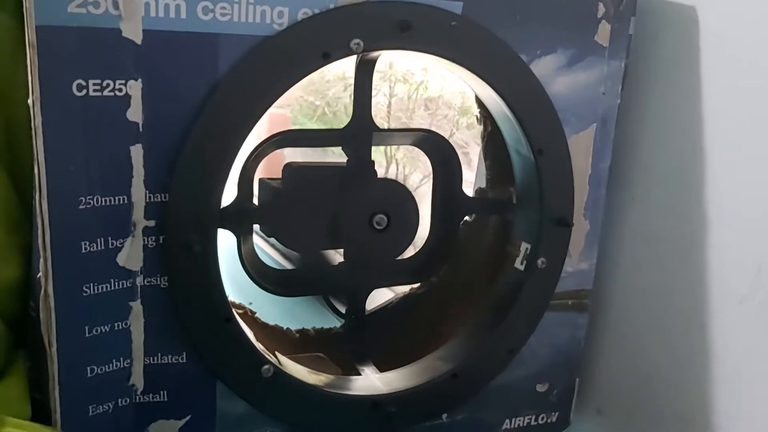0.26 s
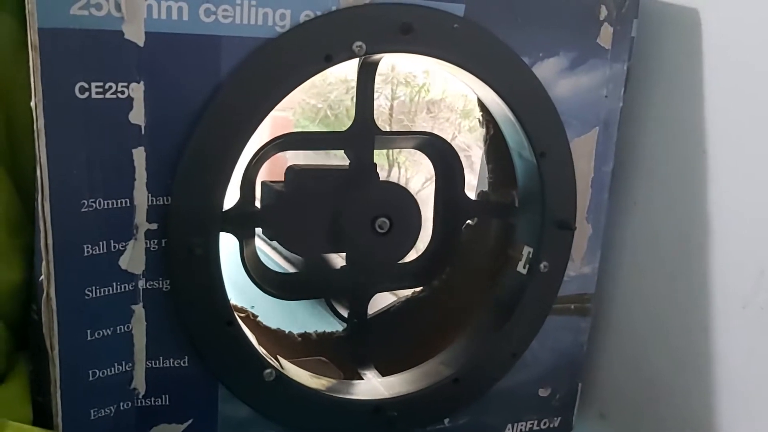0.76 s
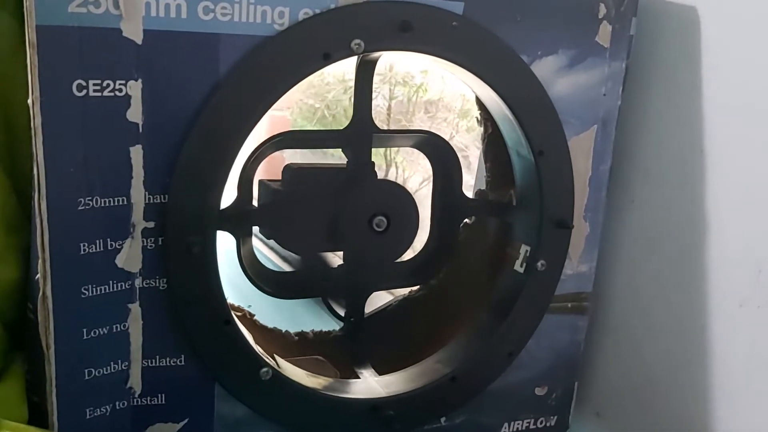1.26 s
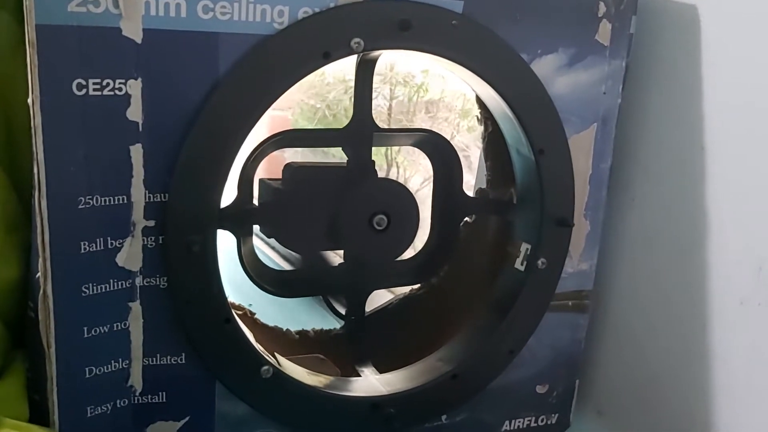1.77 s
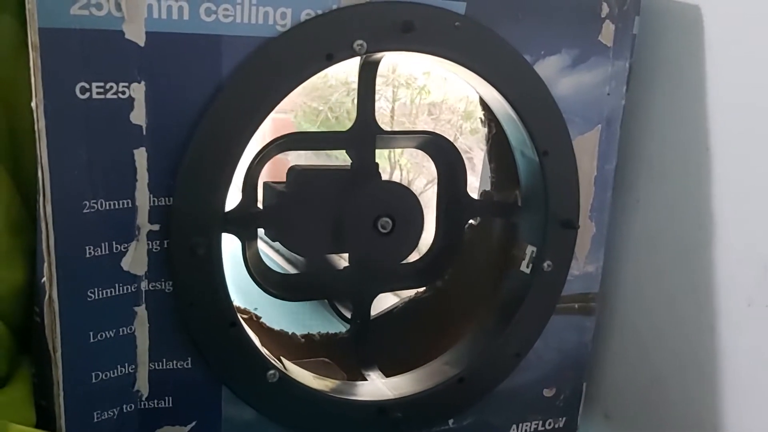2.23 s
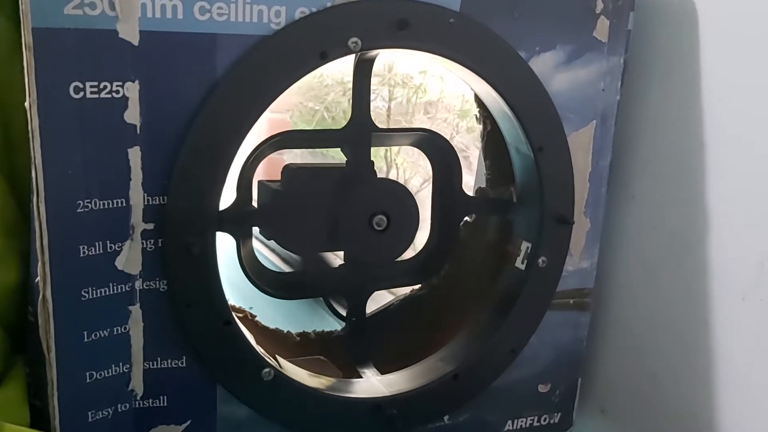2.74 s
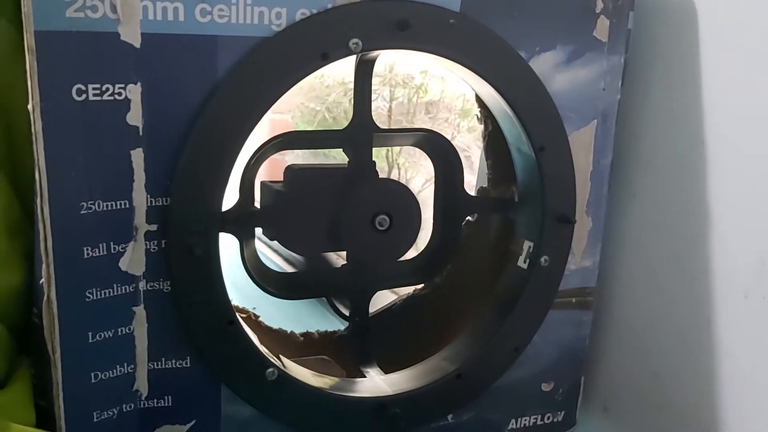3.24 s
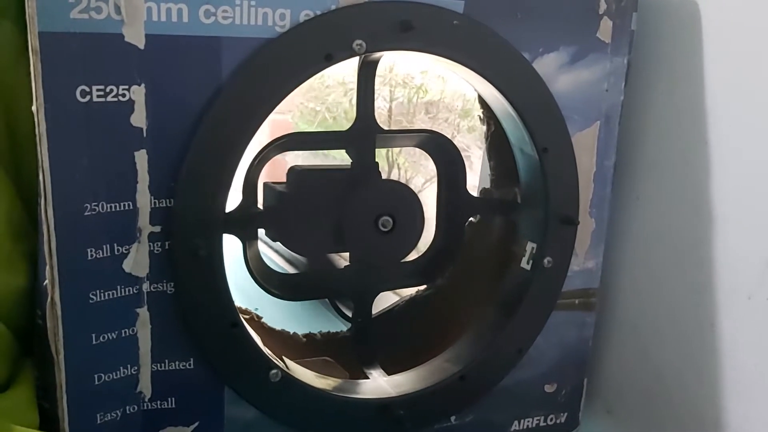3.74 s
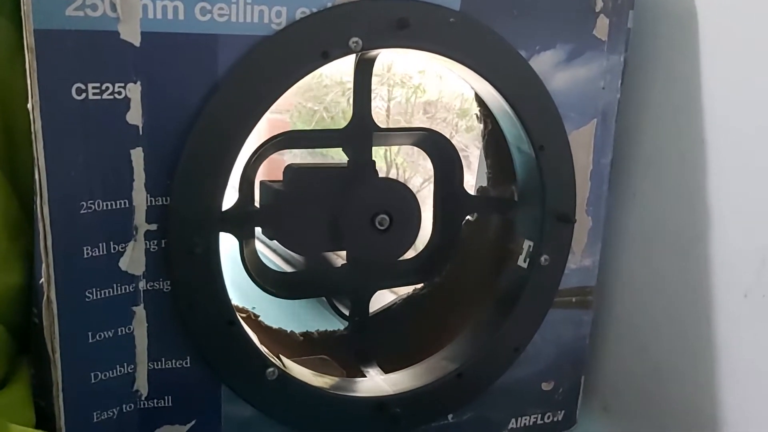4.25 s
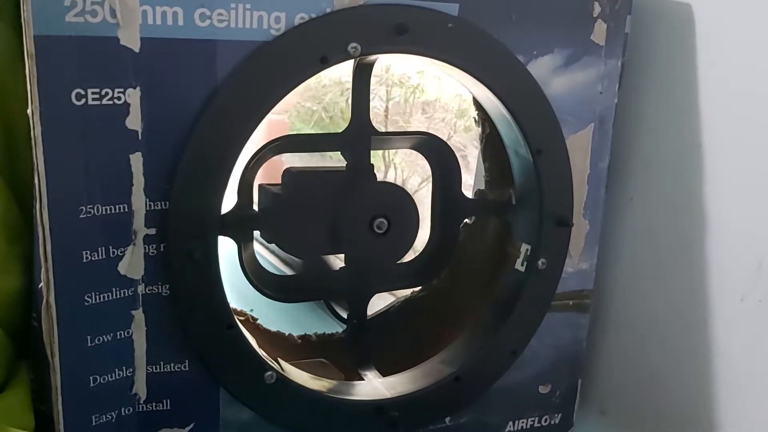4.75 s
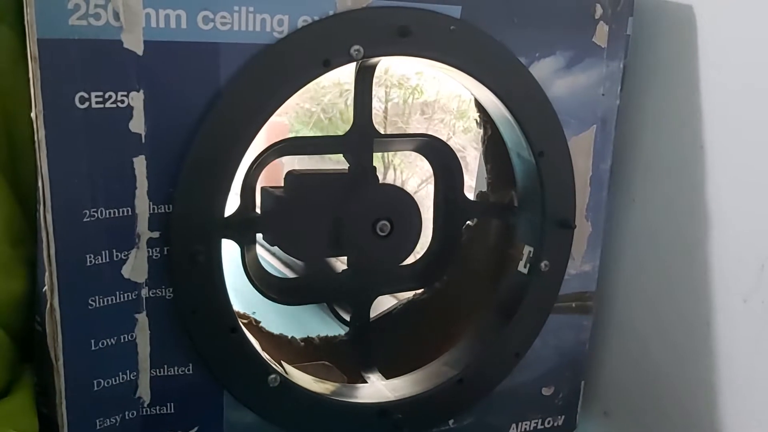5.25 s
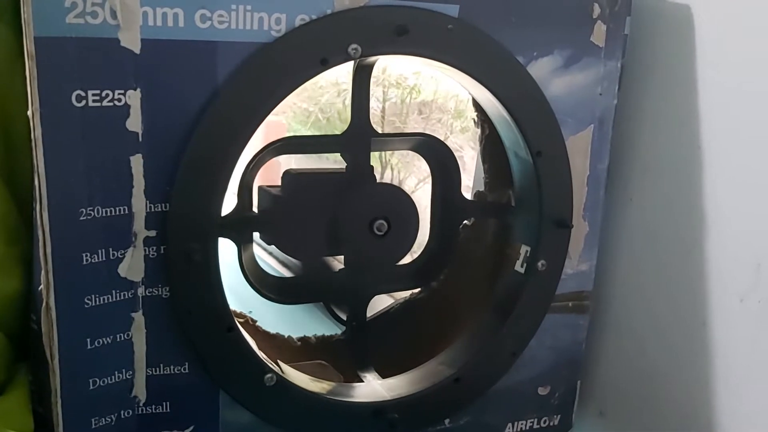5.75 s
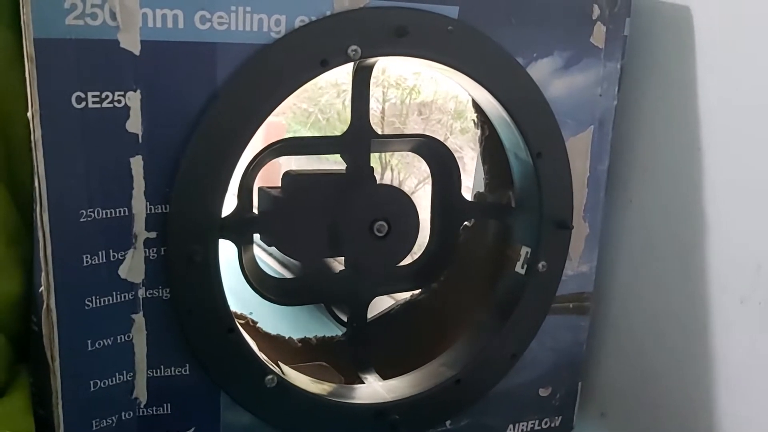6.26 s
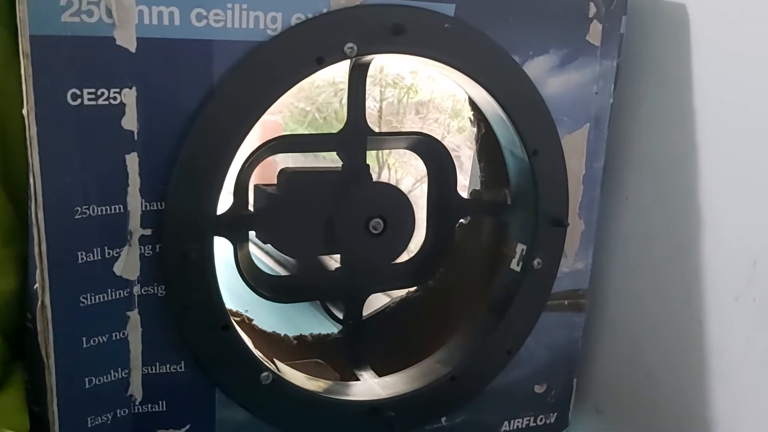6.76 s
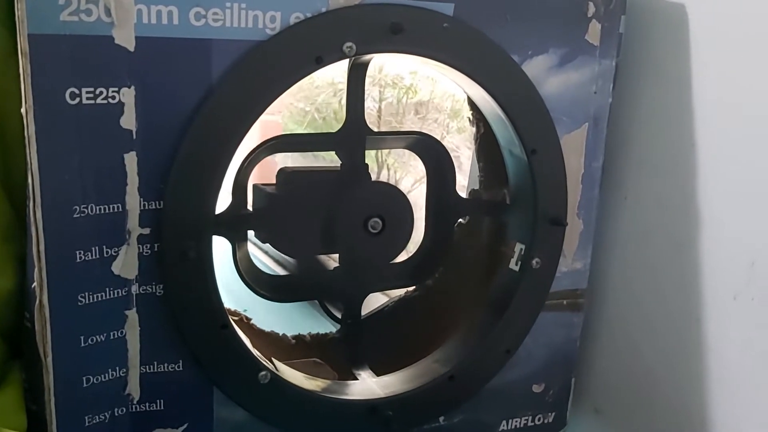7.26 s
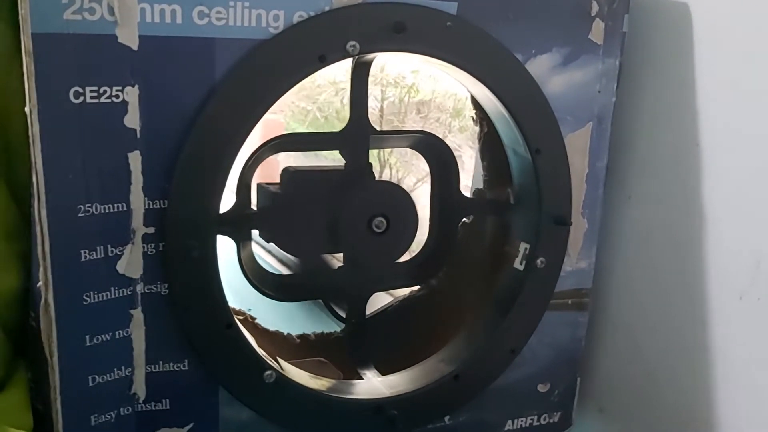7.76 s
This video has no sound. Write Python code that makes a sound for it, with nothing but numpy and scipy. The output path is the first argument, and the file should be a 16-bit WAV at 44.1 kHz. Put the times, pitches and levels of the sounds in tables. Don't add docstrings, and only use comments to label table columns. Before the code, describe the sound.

Continuous low hum of a small electric fan indoors, with faint electrical buzz and a muffled rush of moving air, never stopping.

```python
import sys
import numpy as np
from scipy import signal
from scipy.fft import rfft, irfft
from scipy.io import wavfile
from scipy.ndimage import uniform_filter1d

SR = 44100
rng = np.random.default_rng(int(sys.argv[2]) if len(sys.argv) > 2 else 0)


def gain_from_decibels(decibels):
    exponent = np.asarray(decibels, float) / 20
    return 10 ** exponent


def inscribe(sig):
    pcm = np.round(np.clip(np.atleast_2d(sig).T, -1, 1) * 32767)
    wavfile.write(sys.argv[1], SR, pcm.astype(np.int16))


N = 352800
TIME = np.arange(N) / SR
FREQ = np.maximum(np.arange(N // 2 + 1) * SR / N, 1)
CROSS_HZ = 600


def along(table, column):
    return np.interp(TIME, [row[0] for row in table], [row[column] for row in table])


def across(table, column):
    return np.interp(np.log(FREQ), np.log([row[0] for row in table]), [row[column] for row in table])


def walk(rate):
    hold = int(SR / rate)
    drift = np.repeat(rng.standard_normal(N // hold + 1), hold)
    drift = uniform_filter1d(uniform_filter1d(drift, hold), hold)[:N]
    return drift / drift.std()


def tones(phase, orders, levels, drifts_db, lag):
    port_lag = np.array([[0], [lag]])
    out = np.zeros((2, N))
    for order, db, drift_db in zip(orders, levels, drifts_db):
        level_db = np.array(db)[:, None] + drift_db
        out += np.sqrt(2) * gain_from_decibels(level_db) * np.cos(order * phase - port_lag)
    return out


def swaying_tones(phase, orders, levels, sway_db, rate, lag):
    drifts_db = [sway_db * walk(rate) for _ in orders]
    return tones(phase, orders, levels, drifts_db, lag)


def turbulence(left, right, ports, share):
    like = np.clip(across(ports, 1), 0, 1)
    common, own = rfft(rng.standard_normal((2, N))) * np.sqrt(share * SR / 2)
    shared = like * np.exp(1j * across(ports, 2)) * common
    other = shared + np.sqrt(1 - like ** 2) * own
    return np.array([common * gain_from_decibels(across(left, 1)), other * gain_from_decibels(across(right, 1))])


def blade_phase():
    # t/s, f/Hz
    speed = [
        (0, 78.0),
        (1, 78.06),
        (2, 77.9),
        (2.6, 77.7),
        (3.5, 77.56),
        (4.5, 77.56),
        (5.5, 77.64),
        (8, 77.69),
    ]
    return 2 * np.pi * np.cumsum(along(speed, 1)) / SR + 0.57


def blades(blade):
    # t/s, level above the mean/dB
    load = [(0, -1.1), (1, 1), (1.4, 0.8), (2.5, 1.3), (3.4, -1), (4, 0), (4.7, -0.3), (5.1, 0.6),
            (5.5, -1.5), (6, -0.3), (6.5, -.9), (8, -.5)]
    # left level/dB, right level/dB
    blade_tones = [(-28.3, -24.9), (-44.4, -40), (-45.3, -43.7), (-51, -52.3), (-47.5, -49), (-55.5, -56.3)]
    load_db = along(load, 1)
    drifts_db = [load_db]
    for share in (1.5, 0.51):
        drifts_db.append(share * load_db + 1.1 * walk(1.8))
    hum = tones(blade, (1, 2, 3), blade_tones[:3], drifts_db, lag=0.28)
    upper = swaying_tones(blade + 0.41, (4, 5, 6), blade_tones[3:], sway_db=0.9, rate=3.8, lag=0.25)
    return hum + upper


def wobble(blade):
    blade_count = 3
    turn_orders = (2, 4, 5)
    # left level/dB, right level/dB
    wobble_tones = [(-59, -58), (-56.5, -56.5), (-52, -48)]
    return swaying_tones(blade / blade_count, turn_orders, wobble_tones, sway_db=1.3, rate=4.1, lag=0.05)


def windings():
    mains_hz = 50.015
    mains_orders = (2, 4, 6, 12)
    # left level/dB, right level/dB
    winding_tones = [(-39.7, -40.6), (-66, -57), (-59, -57), (-66, -60)]
    mains = 2 * np.pi * mains_hz * TIME + 0.932
    return swaying_tones(mains, mains_orders, winding_tones, sway_db=0.74, rate=2.2, lag=0.11)


def rumble(colour):
    # f/Hz, level per Hz/dB
    rumble_left = [(18, -71.5), (33, -76), (80, -59.5), (127, -57.5), (198, -70), (211, -70.5),
                   (228, -62.5), (283, -67.5), (301, -64), (364, -67), (446, -65), (568, -71.5),
                   (780, -70.5), (800, -74.5)]
    rumble_right = [(18, -73.5), (31, -76), (75, -56.5), (164, -58.5), (211, -68.5), (234, -60.5),
                    (276, -70.5), (305, -62.5), (369, -70), (452, -65), (482, -68), (507, -67.5),
                    (751, -65), (800, -74)]
    # f/Hz, likeness (0-1), right lead/rad
    rumble_ports = [(30, 0.8, 0), (46, 0.87, 0.055), (170, 0.95, -0.075), (200, 0.91, -0.59),
                    (250, 0.91, -0.62), (400, 0.98, -0.22), (524, 0.94, -0.12), (650, .6, 0.45),
                    (800, 0, 0.45)]
    low = 1 / (1 + (FREQ / CROSS_HZ) ** 8)
    spectrum = turbulence(rumble_left, rumble_right, rumble_ports, low) * colour
    return irfft(spectrum, N) * gain_from_decibels(0.57 * walk(5.6))


def hiss(blade, colour):
    # f/Hz, level per Hz/dB
    hiss_left = [(500, -68), (1030, -77), (1700, -75.5), (1840, -82), (1990, -77.5), (3160, -93),
                 (4470, -89.5), (5500, -96), (7010, -95), (8230, -110.3), (8330, -120.4), (9240, -123.9),
                 (11800, -112.1), (15700, -112.8)]
    hiss_right = [(500, -64.5), (731, -69), (965, -81), (1700, -79), (1760, -81.5), (2400, -75),
                  (2510, -78.5), (4370, -90.5), (6170, -91.9), (7340, -104.8), (8330, -103.7),
                  (10000, -106.4), (10100, -110.6), (15700, -112.9)]
    # f/Hz, likeness (0-1), right lead/rad
    hiss_ports = [(500, 1, 0.31), (800, 0.1, 0.92), (940, 0.089, 0.81), (1020, .7, 0.58),
                  (1300, 0.77, -1.1), (1400, 0.2, 0.031), (1650, 0.44, 0.86), (1800, .1, 0),
                  (2100, .7, -0.15), (2240, 0.41, 0.46), (2400, 0.63, 0.27), (2550, .25, 0.08),
                  (3740, 0.28, -1.3), (9000, .03, 0)]
    high = 1 / (1 + (CROSS_HZ / FREQ) ** 8)
    spectrum = turbulence(hiss_left, hiss_right, hiss_ports, high) * colour
    octave = np.clip(np.log2(FREQ / 700), 0, 4)
    gust_db = 0.28 * walk(3.5)
    out = np.zeros((2, N))
    for k, pulse_db in enumerate([0.9, 0.56, 0.93, 0.5, 0.25]):
        band = np.cos(np.pi / 2 * np.clip(abs(octave - k), 0, 1)) ** 2
        pulse = pulse_db * np.cos(blade - 0.4 - 0.4 * k)
        flicker_db = 0.32 * walk(14)
        out += irfft(spectrum * band, N) * gain_from_decibels(pulse + flicker_db + gust_db)
    return out


def surroundings():
    # f/Hz, width/Hz, left level/dB, right level/dB
    housing = [(91, 12, -1.5, -1.5), (112, 14, -1.5, -0.5), (145, 13, -0.5, 0), (189, 11, 0, -1.5),
               (470, 24, -0.5, -1.5), (513, 26, 0.5, 2), (564, 20, 0, -2), (590, 30, 1, 1),
               (640, 30, -2, -1), (730, 47, -1, 1.6), (892, 18, 0.5, -0.2), (972, 28, 2, 5.5),
               (1093, 31, 3.5, -3), (1425, 44, 1, 1), (1535, 60, -4.5, 0), (1637, 71, 2.5, 1),
               (1930, 82, -2, -3.5), (2050, 83, 2.4, 0), (2250, 88, -2.5, -2.5), (2780, 170, -0.5, -1),
               (2990, 170, 3.5, 1.5), (3280, 290, 3, -2.5), (3770, 330, 2, 2), (6000, 210, 3, 1.5),
               (7080, 250, 3, -1.5), (7960, 510, -6.5, -2.2), (8500, 500, -2.5, 0.5),
               (12200, 1300, -1.5, 1), (14300, 1700, -2.5, -0.5)]
    colour_db = np.zeros((2, len(FREQ)))
    for hz, width, *gains in housing:
        bump = np.exp(-4 * np.log(2) * ((FREQ - hz) / width) ** 2)
        colour_db += np.outer(gains, bump)
    t = np.arange(SR // 10) / SR
    decay = np.exp(-t / 0.015) * (t > 0.004)
    echoes = gain_from_decibels(-39.5) * rng.standard_normal((2, len(t))) * decay
    ripple = np.abs(1 + rfft(echoes, N) * (FREQ > 450))
    return gain_from_decibels(colour_db) * ripple


def scene():
    blade = blade_phase()
    colour = surroundings()
    tonal = blades(blade) + wobble(blade) + windings()
    return tonal + rumble(colour) + hiss(blade, colour)


def low_pass(x):
    return signal.sosfilt(signal.butter(12, 15740, fs=SR, output="sos"), x)


def record(dry):
    return low_pass(dry)


dry = scene()
out = record(dry)
inscribe(out)
```